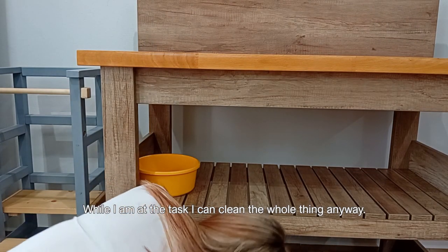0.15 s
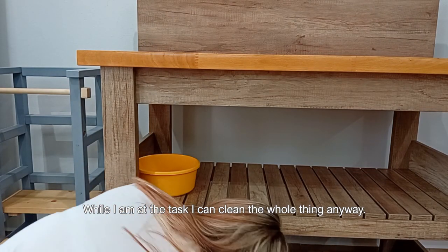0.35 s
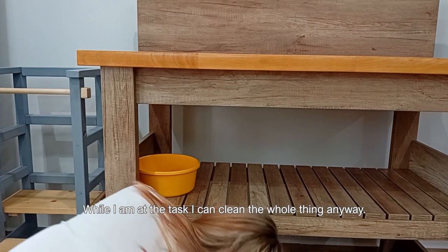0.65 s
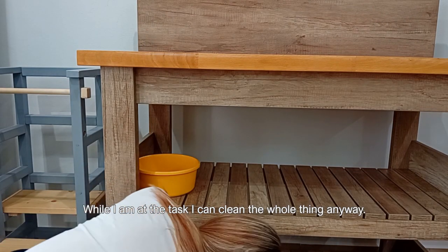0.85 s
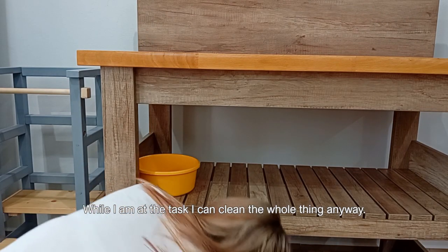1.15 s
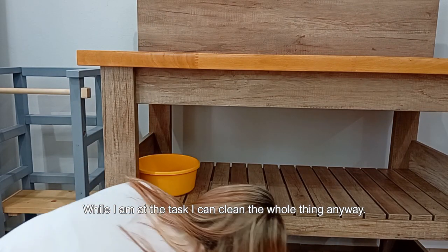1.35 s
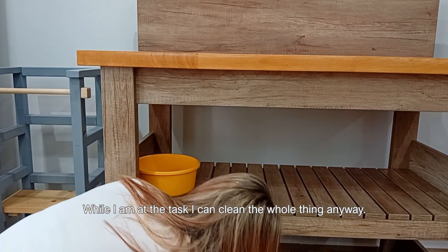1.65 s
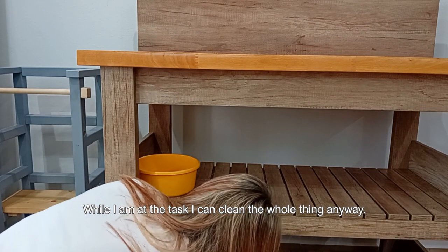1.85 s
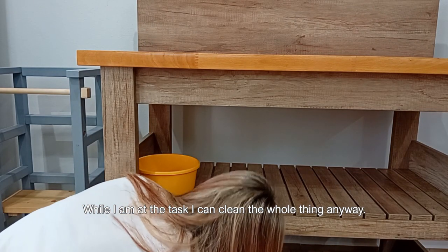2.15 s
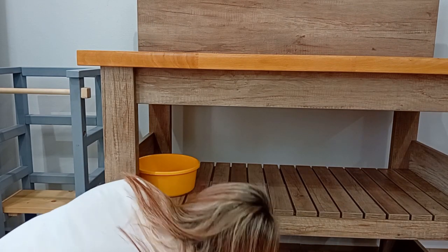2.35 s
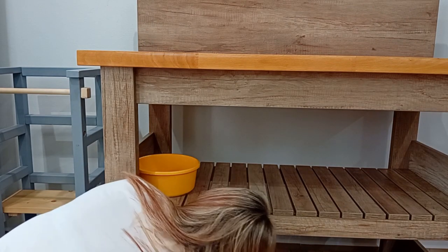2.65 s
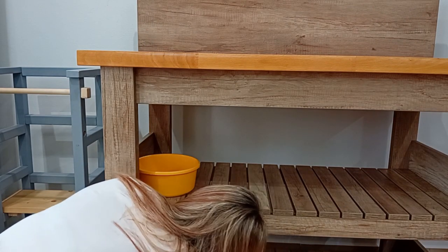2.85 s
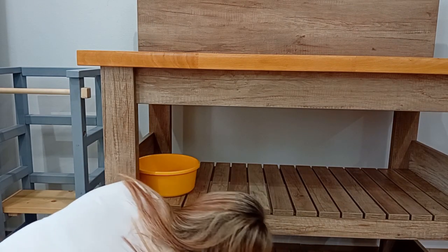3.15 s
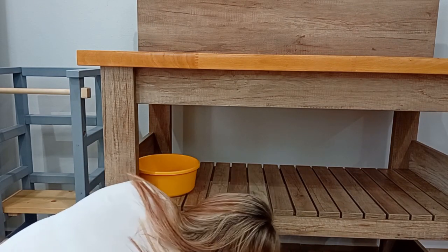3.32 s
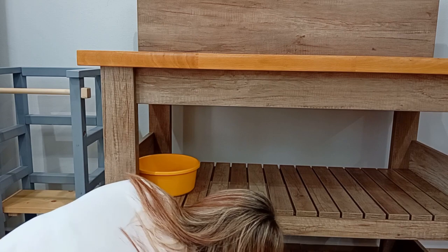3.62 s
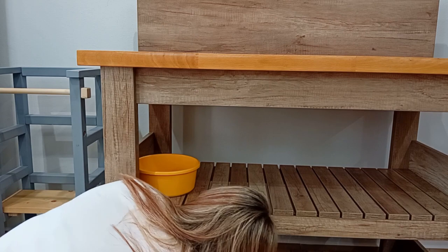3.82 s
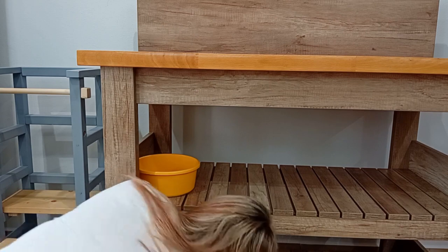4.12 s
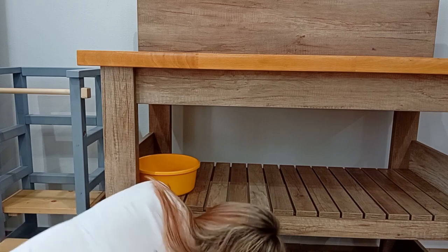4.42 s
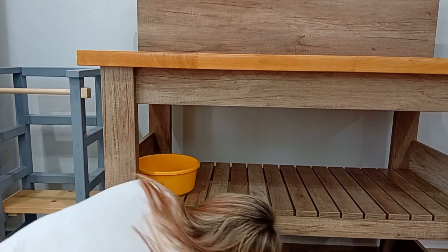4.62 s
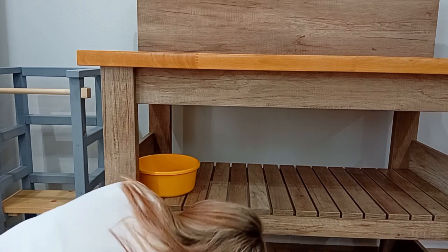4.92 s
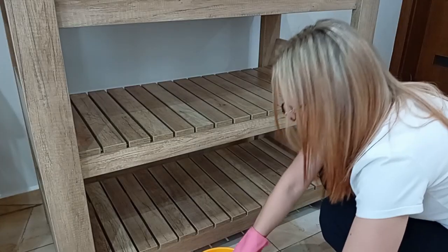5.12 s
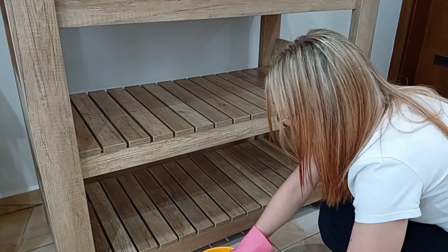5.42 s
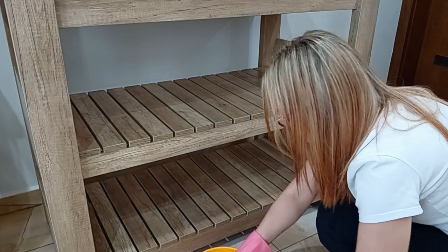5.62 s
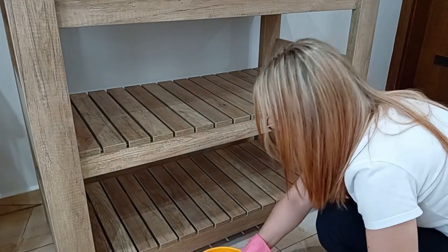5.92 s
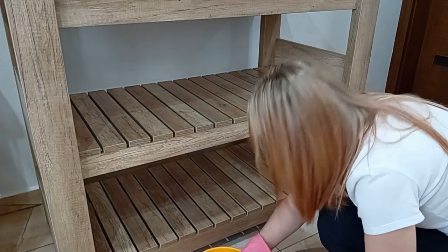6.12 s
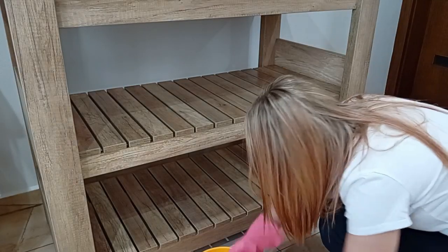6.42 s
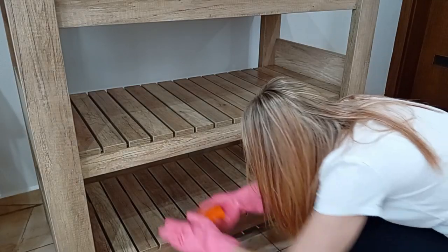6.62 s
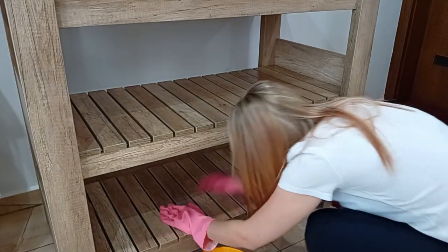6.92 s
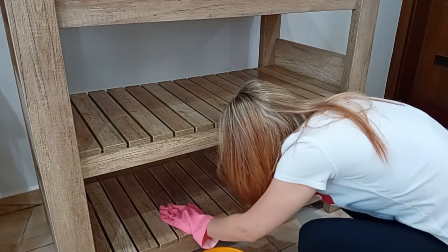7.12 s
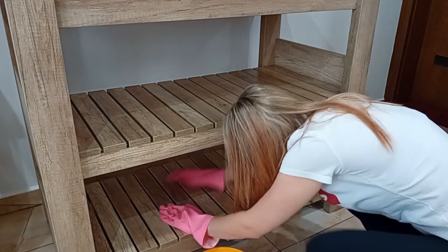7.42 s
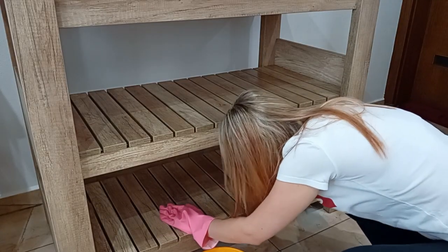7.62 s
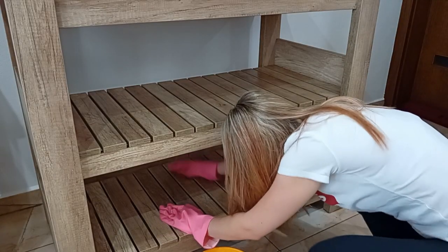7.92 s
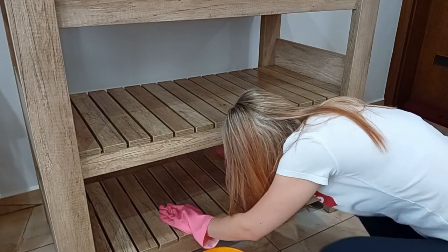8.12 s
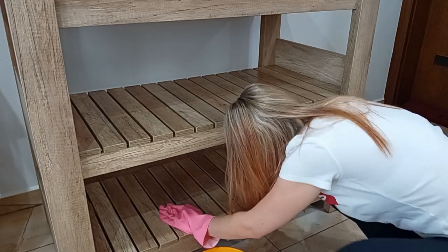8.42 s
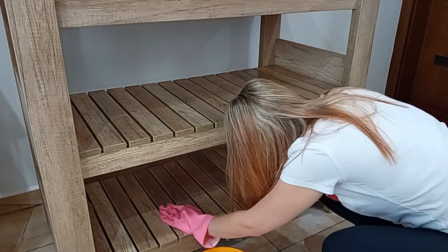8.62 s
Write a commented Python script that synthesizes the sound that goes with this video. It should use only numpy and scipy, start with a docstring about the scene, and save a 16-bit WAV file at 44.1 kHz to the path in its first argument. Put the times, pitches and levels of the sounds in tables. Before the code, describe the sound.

In a quiet kitchen, a wet cloth hisses across wooden slats. Gentle wipes build into quick scrubbing that makes the shelf groan and hum, then fade. Midway, water sloshes softly, drips and trickles into a bowl as the cloth is squeezed. After a brief lull comes a second run of hard strokes, ending lightly. The microphone gives the hiss a bright edge and carries a faint, regular electronic tick.

```python
"""Wiping a wooden shelf.

A damp cloth hisses and squeaks over the slats of a kitchen shelf, lightly at first, then in hard
strokes that set slats and frame humming. In a pause it is wrung out over a plastic bowl, where
drips and a trickle ring as bubbles. The microphone is bright near 5.5 kHz, dull above, and faint
ticks repeat in its electronics."""
import sys
import numpy as np
from scipy import signal
from scipy.fft import rfft, irfft
from scipy.io import wavfile

SR = 44100
rng = np.random.default_rng(int(sys.argv[2]) if len(sys.argv) > 2 else 0)


def log_audio(samples):
    """Write samples as a 16-bit WAV file to the path given in sys.argv[1]."""
    # one column per channel
    frames = np.atleast_2d(samples).T
    # limit to full scale, then quantise
    limited = np.clip(frames, -1, 1)
    pcm = np.round(limited * 32767).astype(np.int16)
    wavfile.write(sys.argv[1], SR, pcm)


N = 386316

# Cloth strokes. Each row: time of full strength, hold, rise and fall in seconds, weave hiss in dB;
# wood, scratch and sheen in dB relative to the weave; then for the slat rumble: lag, hold, rise and
# fall in seconds, level in dB, pitch in Hz, hollowness in dB lost per octave squared from that pitch.
STROKES = [(-0.07, 0.0, 0.02, 0.26, -34.5, -3.5, -7, -25.0, -0.065, 0.018, 0.014, 0.245, -39, 560.0, 4),
           (0.305, 0.064, 0.35, 0.12, -37.5, -11.5, -10.5, -24, -0.12, 0.23, 0.196, 0.084, -62.5, 750.0, 10),
           (0.55, 0.215, 0.32, 0.185, -41, -7.5, -11, -26.0, 0.025, 0.26, 0.25, 0.13, -61.5, 770.0, 4),
           (0.99, 0.165, 0.21, 0.5, -42.5, -7.5, -10.5, -24.0, -0.035, 0.105, 0.115, 0.35, -63.0, 730.0, 13),
           (1.45, 0.0, 0.12, 0.135, -19.5, -3.5, -7.5, -24.5, -0.03, 0.058, 0.087, 0.094, -24.5, 646, 4.0),
           (1.635, 0.004, 0.15, 0.12, -22.5, -4, -6.5, -31, -0.041, 0.082, 0.093, 0.074, -28.5, 630, 5),
           (1.8, 0.04, 0.14, 0.084, -27.5, -4, -6, -27, 0.0063, 0.077, 0.11, 0.04, -35, 700.0, 1.5),
           (2.035, 0, 0.17, 0.17, -29.5, 1, -4.5, -26.0, -0.023, 0.04, 0.064, 0.08, -31, 710, 1.5),
           (2.176, 0.02, 0.049, 0.16, -24.5, -7, -5.0, -29, -0.0052, 0.07, 0.036, 0.065, -28.5, 640.0, 1.5),
           (2.42, 0.049, 0.16, 0.11, -36.5, -7.5, -4.5, -23, 0.0056, 0.02, 0.094, 0.07, -53, 520.0, -3),
           (2.545, 0.0084, 0.17, 0.16, -25.5, -3, -6.5, -27, -0.0055, 0.043, 0.1, 0.1, -32, 600.0, 7),
           (2.925, 0.0, 0.46, 0.18, -34, -6.0, -6, -27.5, -0.095, 0.13, 0.259, 0.102, -52.5, 620.0, 6),
           (3.14, 0.028, 0.18, 0.24, -37.5, -3, -5.0, -30, 0.0023, 0.08, 0.119, 0.186, -54.5, 980.0, 0.5),
           (3.43, 0.185, 0.46, 0.28, -44.0, -8.5, -9, -22.5, -0.075, 0.13, 0.28, 0.196, -63, 690.0, 6.0),
           (3.86, 0.13, 0.1, 0.038, -45, -9.5, -9, -23.5, 0.037, 0.155, 0.077, 0.035, -64, 600.0, 0),
           (4.1, 0.12, 0.285, 0.083, -47, -10, -8.5, -21.5, 0.063, 0.016, 0.199, 0.052, -59, 600.0, 13),
           (4.51, 0.14, 0.41, 0.345, -44.5, -7.5, -8.5, -25.0, -0.044, 0.045, 0.262, 0.241, -64, 900.0, 0),
           (4.945, 0.0069, 0.022, 0.11, -47.5, -3, -3, -24.0, 0.005, 0, 0.017, 0.084, -52.5, 890.0, 6),
           (6.91, 0.03, 0.085, 0.1, -32, -6, -6.5, -17, -0.015, 0.033, 0.058, 0.07, -36.5, 420.0, 5.0),
           (7.01, 0.04, 0.1, 0.14, -23.5, -4.5, -7, -20.5, -0.02, 0.073, 0.079, 0.088, -28.0, 570.0, 7.5),
           (7.182, 0.12, 0.077, 0.11, -23.0, -5.5, -6.5, -19, -0.015, 0.14, 0.07, 0.091, -28, 680, 6.0),
           (7.41, 0.052, 0.21, 0.2, -30.5, -2.5, -3.0, -30, -0.013, 0.02, 0.07, 0.105, -34, 804.6, 5.5),
           (7.555, 0.0, 0.2, 0.16, -27.5, -3.5, -6, -27, -0.014, 0.039, 0.13, 0.088, -31.5, 910, 1.5),
           (7.78, 0.067, 0.11, 0.11, -34.0, 1, -2.5, -21, 0.0098, 0.012, 0.045, 0.08, -29.5, 716, 12),
           (7.884, 0.0, 0.14, 0.12, -22, -8.5, -8.0, -28.5, -0.03, 0.049, 0.11, 0.07, -32.5, 660.0, 19),
           (8.141, 0.031, 0.23, 0.2, -30.5, -4.5, -5.5, -23.5, 0.067, 0.023, 0.14, 0.09, -31, 646, 10.5),
           (8.5, 0.0, 0.25, 0.1, -33.5, -11, -8, -24, -0.063, 0.07, 0.14, 0.066, -59, 715, 5),
           (8.695, 0.0, 0.3, 0.14, -38, -9.5, -8.5, -26, -0.045, 0.06, 0.161, 0.088, -58.0, 790.0, 4)]
# Wet cloth and stirred water under the strokes. Each row: time in seconds, hiss in dB; low zone, middle
# zone and sheen in dB relative to it; slosh in dB, pitch in Hz, hollowness in dB per octave squared.
WET_BED = [(4.95, -57, 6, -1, -27, -63.5, 700, 6), (5.03, -56.5, -2, -4, -26, -55.5, 830, 17),
           (5.12, -56, 8, 4, -24, -47, 880, 25), (5.23, -59, 2.5, -6, -28, -60, 786, 15),
           (5.43, -52, -1.5, -4, -30, -57.5, 1100, 4), (5.62, -54, -3, 1.5, -21, -64.5, 670, 2),
           (5.76, -51.5, -4, -0.5, -29, -66, 700, 1.8), (5.83, -46, -13, -11, -15, -57.5, 1100, 8),
           (5.92, -53.5, -5, -6, -28, -65, 900, 4.5), (6.1, -54.5, -5, -6, -31, -65.5, 650, 4),
           (6.46, -58, -1.5, -7, -43, -65, 520, 4.4), (6.73, -51, -10.5, -12.5, -43, -67, 450, 4),
           (6.9, -54, 10, -4, -27, -60, 700, 6)]
# Spectrum of the cloth's hiss. Each row: frequency in Hz, relative level in dB.
CLOTH_SPECTRUM = [(760, -77), (1300, -1.5), (1660, 1), (1840, -1.5), (1960, 0), (2840, -2.5), (3140, -3),
                  (5470, 6.5), (7250, -5.5), (8000, -26), (10400, -49), (17600, -120)]
# Spectrum of the treble sheen on the hiss. Each row: frequency in Hz, relative level in dB.
SHEEN_SPECTRUM = [(4710, -22), (8000, -1.5), (9690, -11), (10600, -20), (12100, -30), (13000, -51),
                  (14800, -14), (15700, -11)]
# Slat modes. Each row: frequency in Hz, width in Hz, relative level in dB.
SLAT_MODES = [(274, 54, 2.5), (350, 45, 5.5), (438, 72, 5.5), (522, 59, 2), (600, 23.4, 2), (650, 45, 1),
              (711, 15, -0.5), (770, 21, -3.5), (807, 38, 1.5), (892, 38, 0.5), (1002, 76, 4.5),
              (1060, 117, 5), (1150, 59, 5), (1296, 104, 3.5)]
# Dull thud of the hand's weight. Each row: frequency in Hz, relative level in dB.
THUD_SPECTRUM = [(15, -57), (25, -21), (48, -40), (118, -9.5), (173, 3.5), (300, -3), (390, -31),
                 (660, -120)]
# Frame modes. Each row: frequency in Hz, pitch wander in Hz.
FRAME_MODES = [(86, 2.0), (122, 1.96), (215, 6.07)]
# Jolts to the frame. Each row: time of full strength, hold, rise and fall in seconds, level in dB,
# mode in Hz.
FRAME_JOLTS = [(-0.04, 0.066, 0.02, 0.55, -62.5, 215.0), (-0.01, 0, 0.4, 0.19, -49.5, 122.0),
               (0.034, 0.11, 0.11, 0.04, -51.5, 86.0), (0.27, 0.48, 0.25, 0.5, -72, 215.0),
               (1.42, 0.091, 0.057, 0.04, -40.5, 215.0), (1.44, 0.0038, 0.058, 0.14, -43, 122.0),
               (1.46, 0.0, 0.16, 0.046, -50.5, 86.0), (1.66, 0.06, 0.27, 0.03, -56, 215.0),
               (1.7, 0.041, 0.13, 0.08, -50.5, 86.0), (1.83, 0.084, 0.1, 0.07, -47, 215.0),
               (1.87, 0.02, 0.16, 0.22, -54, 122.0), (2.0, 0.05, 0.11, 0.07, -50.5, 86.0),
               (2.07, 0.0018, 0.084, 0.033, -45.5, 215.0), (2.21, 0.069, 0.05, 0.036, -54.5, 86.0),
               (2.23, 0.014, 0.073, 0.12, -44.0, 215.0), (2.38, 0.0, 0.034, 0.03, -51, 215.0),
               (2.41, 0.076, 0.05, 0.03, -59, 86.0), (2.53, 0.0054, 0.085, 0.14, -53.5, 215.0),
               (2.56, 0.028, 0.24, 0.17, -58, 122.0), (2.9, 0.022, 0.04, 0.19, -58, 86.0),
               (2.92, 0.082, 0.04, 0.064, -51, 122.0), (2.97, 0, 0.25, 0.5, -61.5, 215.0),
               (5.19, 0.0, 0.094, 0.17, -64.0, 86.0), (6.87, 0, 0.026, 0.03, -48.5, 215.0),
               (6.9, 0.08, 0.07, 0.06, -46.5, 86.0), (6.9, 0.12, 0.11, 0.16, -50.5, 122.0),
               (7.02, 0.0, 0.14, 0.26, -42.5, 215.0), (7.13, 0.1, 0.04, 0.2, -40, 122.0),
               (7.29, 0.11, 0.17, 0.18, -48.5, 86.0), (7.31, 0.0, 0.11, 0.1, -41.5, 215.0),
               (7.41, 0.083, 0.14, 0.18, -43.0, 122.0), (7.44, 0, 0.08, 0.16, -53.5, 86.0),
               (7.5, 0.058, 0.089, 0.084, -42, 215.0), (7.79, 0.0, 0.033, 0.086, -44.5, 215.0),
               (7.84, 0.047, 0.26, 0.1, -59, 122.0), (7.87, 0.0064, 0.14, 0.05, -55, 86.0),
               (8.0, 0.015, 0.04, 0.03, -54, 86.0), (8.03, 0.01, 0.09, 0.08, -61.0, 122.0),
               (8.07, 0.01, 0.05, 0.03, -52, 215.0), (8.17, 0.0, 0.16, 0.22, -47.5, 215.0),
               (8.284, 0.13, 0.063, 0.07, -42.5, 122.0), (8.33, 0, 0.08, 0.1, -58, 86.0)]
# Rough narrow tones: groans of the wood, and one thin high hiss near 5.8 kHz as the pause ends.
# Each row: middle in seconds, half length in seconds, pitch in Hz, level in dB.
ROUGH_TONES = [(0.013, 0.018, 590, -44), (1.44, .1, 700, -32.5), (1.64, .12, 590, -34.5),
               (1.65, .1, 1570, -32.5), (2.03, .12, 600, -34), (2.23, .12, 350, -38), (2.33, .15, 215, -57),
               (2.49, 0.08, 510, -36.5), (2.598, .1, 787, -38.5), (2.92, .05, 5620, -34),
               (2.93, .05, 4770, -34), (4.075, .04, 442, -54), (4.145, .05, 598, -50.5),
               (4.58, .07, 2640, -51), (4.58, .06, 3900, -51), (4.95, 0.037, 2210, -45),
               (6.7, .17, 5800, -56), (6.72, 0.045, 338, -60), (7.02, .14, 590, -36.5),
               (7.04, .1, 520, -38), (7.25, .08, 420, -42), (7.27, .1, 640, -41), (7.49, .07, 490, -38),
               (7.57, 0.065, 1060, -38.5), (7.58, .07, 1150, -40), (7.76, .08, 522, -38.5),
               (7.86, .12, 810, -38), (7.89, .06, 480, -36), (7.92, .06, 580, -42),
               (8.212, .09, 650, -33.5), (8.22, .07, 525, -36.5)]
# Snags on slat edges and slaps on the water. Each row: start in seconds, level in dB, T60 in seconds.
SNAGS = [(2.1597, -19, 0.087), (5.101, -39, .02), (5.446, -44, .015), (5.7, -35, 0.017), (5.816, -39, .03),
         (6.0, -52, .02), (6.9198, -10.5, 0.0085)]
# Bubbles in the bowl. Each row: start in seconds, level in dB, pitch in Hz, T60 in seconds,
# glide in octaves per second.
DRIPS = [(5.0, -47, 4250, 0.091, 0), (5.03, -45, 796, 0.13, -0.5), (5.059, -35.5, 770, 0.11, -1.5),
         (5.067, -43, 2630, 0.068, 6), (5.077, -42, 5400, 0.076, 2), (5.101, -29, 916, 0.081, -4),
         (5.102, -34.5, 1910, 0.12, -0.5), (5.102, -29, 4180, 0.015, 0), (5.104, -33.5, 1480, 0.085, 3),
         (5.125, -31.5, 840, 0.045, -4), (5.147, -38.5, 800, 0.086, 1.5), (5.19, -43, 725, 0.13, 1),
         (5.291, -48, 1087, 0.09, 1), (5.316, -42, 3570, 0.044, 3), (5.389, -46, 1150, 0.12, 1),
         (5.446, -38, 5870, 0.093, 1.5), (5.479, -42.5, 2790, .12, -0.5), (5.556, -31, 3050, 0.022, 6),
         (5.557, -45, 1400, 0.045, -4), (5.557, -35, 4110, 0.036, 3), (5.57, -46, 2900, 0.33, -1.5),
         (5.621, -22, 3900, 0.018, 2), (5.566, -42.5, 6600, 0.033, 3), (5.645, -46, 2060, 0.21, 4.5),
         (5.667, -43.5, 6120, 0.23, -1), (5.72, -40, 3090, 0.13, 0), (5.7, -45, 2290, 0.26, 0),
         (5.783, -32.5, 4460, 0.073, -2), (5.786, -29.5, 4790, 0.096, 0.5), (5.81, -39, 4540, 0.081, -3),
         (5.82, -49, 1227, 0.17, 1.5), (5.82, -50, 2100, 0.23, 0.5), (5.822, -58, 855, 0.12, -2),
         (5.843, -32, 6340, 0.047, -4), (5.859, -41, 5800, 0.1, 4), (5.87, -48, 2290, .35, 0),
         (6.0, -36.5, 5800, 0.051, -1), (6.028, -45, 6140, 0.027, 0)]
# Spectrum of the room's air. Each row: frequency in Hz, relative level in dB.
AIR_SPECTRUM = [(18, -33), (30, -5), (108, 8), (271, 6), (508, -2.5), (610, -23.5), (752, 0), (1340, -10),
                (3010, -14), (5510, -6), (8160, -24), (13400, -20.5), (15700, -5)]
# Runs of ticks. Each row: start in seconds, end in seconds.
TICK_RUNS = [(.0019, 4.95), (5.0428, 8.7)]

CONTROL_HOP_SAMPLES = 64


def cloth(hiss_db, wood_db, scratch_db, sheen_db):
    """The weave hisses in three zones under a sheen; each wavers as folds stick and slip."""
    spectrum = rfft(colour(fibre_slips(per_s=14000, spread_db=0), CLOTH_SPECTRUM))
    hz = np.arange(N // 2 + 1) * SR / N
    centres_hz, zone_edges_hz = np.geomspace(1300, 7600, num=10), (2400, 4200)
    zones = np.zeros((3, N))
    for k, centre_hz in enumerate(centres_hz):
        share = np.interp(hz, centres_hz, np.arange(len(centres_hz)) == k)   # slices sum to 1
        band = irfft(spectrum * share, N)
        zones[np.searchsorted(zone_edges_hz, centre_hz)] += from_db(drift(11.3)) * band
    wood, scratch, weave = (unit_rms(zone) for zone in zones)
    sheen_gain = from_db(sheen_db + 2.3 * drift(12))
    sheen = colour(fibre_slips(per_s=6600, spread_db=2), SHEEN_SPECTRUM)
    mix = weave + from_db(wood_db) * wood + from_db(scratch_db) * scratch + sheen_gain * sheen
    return from_db(hiss_db + 0.38 * drift(22)) * mix


def fibre_slips(per_s, spread_db):
    """Fibres slip on the grain: dense tiny clicks, rms 1."""
    sizes = from_db(spread_db * np.minimum(rng.exponential(1, N), 5)) * rng.choice([-1, 1], N)
    return unit_rms(sizes * (rng.random(N) < per_s / SR))


def wiping():
    """Strokes over the wet bed: control curves for cloth() and slats()."""
    at_s, hold_s, rise_s, fall_s, hiss_db, *zones_db = np.transpose(STROKES)[:8]
    lag_s, *shape_s, rumble_db, pitch_hz, hollowness = np.transpose(STROKES)[8:]
    bed = curves(WET_BED)
    hisses_db = hiss_db[:, None] + swell_db(at_s, hold_s, rise_s, fall_s)
    rumbles_db = rumble_db[:, None] + swell_db(at_s + lag_s, *shape_s)
    cloth_controls = blend(hisses_db, bed[0], zones_db, bed[1:4])
    slat_controls = blend(rumbles_db, bed[4], (pitch_hz, hollowness), bed[5:])
    return cloth_controls, slat_controls


def squeaks(hiss_db):
    """Damp threads catch and sing briefly at random pitches, louder in hard strokes."""
    out = np.zeros(N + SR)
    for when, pitch, size, length in rng.random((600, 4)):
        t = np.arange(round((0.032 + 0.06 * length) * SR)) / SR
        hz = 1200 * 2 ** (2.5 * pitch)
        envelope = from_db(7.1 * size) * np.hanning(len(t))
        out[int(when * N):][:len(t)] += envelope * np.sin(2 * np.pi * hz * t)
    level_db = hiss_db - 7.5 + 0.35 * (hiss_db + 25)
    return from_db(level_db) * unit_rms(out[:N])


def slats(rumble_db, pitch_hz, hollow_db_per_oct2):
    """Friction drives the slat modes, most near the pitch under the hand; the hand's weight thuds."""
    rubs = [fibre_slips(per_s=2500, spread_db=2.52) for _ in range(3)]
    out, power = 0, 0
    for k, (hz, width_hz, db) in enumerate(SLAT_MODES):
        loss_db = np.maximum(hollow_db_per_oct2, 0) * np.log2(hz / pitch_hz) ** 2
        gain = from_db(db - loss_db + 3.4 * drift(4.5))
        ring = resonance(rubs[k % 3], hz, width_hz)
        out += gain * unit_rms(resonance(ring, hz, 2.6 * width_hz))
        power += gain ** 2
    thud = from_db(-17) * colour(rng.standard_normal(N), THUD_SPECTRUM)
    return from_db(rumble_db) * (out / np.sqrt(power) + thud)


def frame(rest_db=-79):
    """Each jolted frame mode hums as a sine that wavers in pitch and strength."""
    *timing_s, peak_db, mode_hz = np.transpose(FRAME_JOLTS)
    jolts_db = peak_db[:, None] + swell_db(*timing_s)
    out = 0
    for hz, wander_hz in FRAME_MODES:
        db, = blend(jolts_db[mode_hz == hz], rest_db + 4 * drift(5))
        phase = 2 * np.pi * np.cumsum(hz + wander_hz * drift(9.5)) / SR
        out += np.sqrt(2) * from_db(db + 2.8 * drift(36)) * np.sin(phase)
    return out


def rough_tones():
    """Rough narrow tones swell and fade: stick-slip groans, and one thin high hiss."""
    out = np.zeros(N)
    roughness, waver = from_db(4.8 * drift(50)), 2 ** (0.0388 * drift(41))
    for middle_s, half_s, hz, db in ROUGH_TONES:
        span = np.arange(max(round((middle_s - half_s) * SR), 0), round((middle_s + half_s) * SR))
        tone = np.sin(2 * np.pi * np.cumsum(hz * waver[span]) / SR)
        out[span] += from_db(db) * np.hanning(len(span)) * roughness[span] * tone
    return out


def snags(cutoff_hz=7000):
    """The cloth catches an edge or slaps the water: a sudden burst of hiss that dies fast."""
    envelope, t = np.zeros(N), np.arange(SR // 8) / SR
    for start_s, db, t60_s in SNAGS:
        envelope[round(start_s * SR):][:len(t)] += from_db(db - 60 * t / t60_s)
    bursts = envelope * colour(rng.standard_normal(N), CLOTH_SPECTRUM)
    return signal.sosfilt(signal.butter(8, cutoff_hz, fs=SR, output="sos"), bursts + 1e-18)


def drips(attack_s=0.00055):
    """Each trapped bubble rings as a dying, gliding sine, made ragged by the stirred surface."""
    out, t = np.zeros(N), np.arange(SR // 4) / SR
    roughness, waver = from_db(3.5 * drift(120)), 2 ** (0.022 * drift(110))
    attack = 1 - np.exp(-t / attack_s)
    for start_s, db, hz, t60_s, glide_oct_per_s in DRIPS:
        span = round(start_s * SR) + np.arange(len(t))
        phase = 2 * np.pi * np.cumsum(hz * 2 ** (glide_oct_per_s * t) * waver[span]) / SR
        out[span] += from_db(db - 60 * t / t60_s) * attack * roughness[span] * np.sin(phase)
    return out


def trickle(span_s=(5.5, 5.95), low_hz=1890, high_hz=3260, max_db=-52, t60_s=0.11):
    """A thin stream runs off the cloth: small bubbles, each rising in pitch as it dies."""
    out, t = np.zeros(N), np.arange(SR // 10) / SR
    for when, pitch, softness in rng.random((60, 3)):
        hz = low_hz * (high_hz / low_hz) ** pitch * 2 ** (1.5 * t)
        envelope = from_db(max_db - 7.2 * softness - 60 * t / t60_s)
        start = int(np.interp(when, [0, 1], span_s) * SR)
        out[start:][:len(t)] += envelope * np.sin(2 * np.pi * np.cumsum(hz) / SR)
    return out


def kitchen_echo(x, level_db=-7, t60_s=0.25, gap_s=0.006):
    """Diffuse echo: noise dying at the room's rate after a short gap."""
    t = np.arange(SR // 2) / SR
    tail = rng.standard_normal(len(t)) * from_db(-60 * t / t60_s) * (t > gap_s)
    return from_db(level_db) * signal.fftconvolve(x, tail / np.sqrt(np.sum(tail ** 2)))[:N]


def room_air(level_db=-64):
    """Steady, faint noise of the still room."""
    return from_db(level_db) * colour(rng.standard_normal(N), AIR_SPECTRUM)


def ticks(period_s=0.10166, gap_s=0.0079, width_s=55e-6):
    """The electronics spike up, then down; fainter spikes fill the period in twelfths."""
    spikes = np.zeros(N + SR)
    for start_s, end_s in TICK_RUNS:
        pairs_s = np.arange(start_s, end_s, period_s)
        fill_s = np.arange(start_s, end_s, period_s / 12)
        spikes[np.round(fill_s * SR).astype(int)] = from_db(-46) * rng.uniform(-1, 1, len(fill_s))
        # The pair replaces the first two faint spikes.
        for delay_s, height in (period_s / 12, 0), (0, from_db(-39)), (gap_s, -from_db(-40)):
            spikes[np.round((pairs_s + delay_s) * SR).astype(int)] = height
    u = np.arange(-12, 13) / (width_s * SR)
    pulse = 0.9 * (1 - u ** 2) * np.exp(-u ** 2 / 2) + 0.2 * (u == 0)   # hump between dips, sharp tip
    return np.convolve(spikes[:N], pulse, "same")


def from_db(db):
    return 10 ** (np.asarray(db) / 20)


def unit_rms(x):
    return x / np.sqrt(np.mean(x ** 2) + 1e-20)


def curves(rows):
    """Columns of a timed table, interpolated per sample."""
    at_s, *columns = np.transpose(rows)
    return [np.interp(np.arange(N) / SR, at_s, column) for column in columns]


def drift(rate_hz):
    """Slow random wander, rms 1."""
    hop = 40
    pole = np.exp(-2 * np.pi * rate_hz * hop / SR)
    noise = rng.standard_normal(N // hop + 2002)
    slow = signal.lfilter([1], [1, -2 * pole, pole * pole], noise)[2000:]
    return np.interp(np.arange(N) / hop, np.arange(len(slow)), unit_rms(slow))


def colour(x, spectrum):
    """Filters x by a spectrum table; rms 1."""
    hz = np.maximum(np.arange(N // 2 + 1) * SR / N, 1)
    at_hz, db = np.transpose(spectrum)
    gain = from_db(np.interp(np.log(hz), np.log(at_hz), db))
    return unit_rms(irfft(rfft(x) * gain, N))


def resonance(x, hz, width_hz):
    """Two-pole resonance, peak gain 1."""
    r = np.exp(-np.pi * width_hz / SR)
    feedback = [1, -2 * r * np.cos(2 * np.pi * hz / SR), r * r]
    return signal.lfilter(np.array([1, 0, -1]) * (1 - r * r) / 2, feedback, x)


def swell_db(at_s, hold_s, rise_s, fall_s):
    """Rounded envelope per event at control rate, 20 dB down one rise or fall time from the hold."""
    t = np.arange(0, N + CONTROL_HOP_SAMPLES, CONTROL_HOP_SAMPLES) / SR
    before = np.maximum(at_s[:, None] - t, 0) / rise_s[:, None]
    after = np.maximum(t - (at_s + hold_s)[:, None], 0) / fall_s[:, None]
    return -20 * (before + after) ** 1.5


def blend(events_db, bed_db, traits=(), bed_traits=()):
    """Power sum of events and bed in dB, then each trait's power-weighted mean."""
    def per_sample(curve):
        return np.interp(np.arange(N) / CONTROL_HOP_SAMPLES, np.arange(len(curve)), curve)
    power, bed_power = from_db(2 * events_db), from_db(2 * bed_db)
    total = per_sample(power.sum(axis=0)) + bed_power
    means = [(per_sample(trait @ power) + bed_trait * bed_power) / total
             for trait, bed_trait in zip(traits, bed_traits)]
    return 10 * np.log10(total), *means


def scene():
    """Cloth, wood and water over still air; only drips, snags and trickle echo."""
    cloth_controls, slat_controls = wiping()
    transients = drips() + snags() + trickle()
    air = room_air()
    rubbing = cloth(*cloth_controls) + squeaks(hiss_db=cloth_controls[0])
    direct = rubbing + slats(*slat_controls) + rough_tones() + frame() + transients
    return (direct + kitchen_echo(transients) + air)[None]


def record(dry):
    """The electronics add ticks; a steep low-pass cuts the top."""
    stop_db, stop_hz = 70, 16065
    return signal.sosfilt(signal.cheby2(16, stop_db, stop_hz, fs=SR, output="sos"), dry + ticks())


dry = scene()
out = record(dry)
log_audio(out)
```